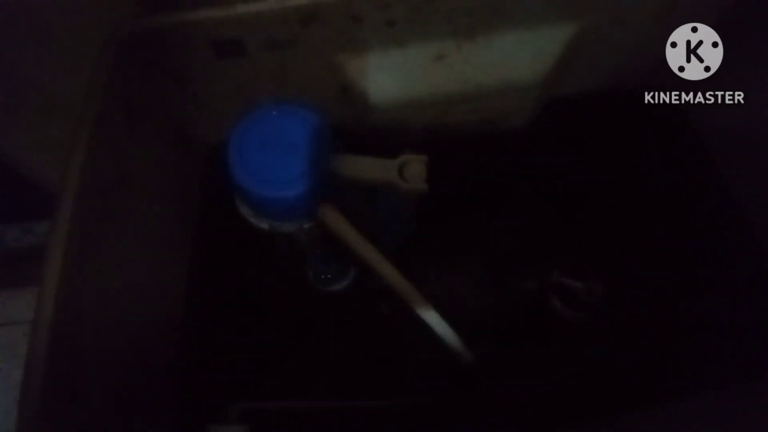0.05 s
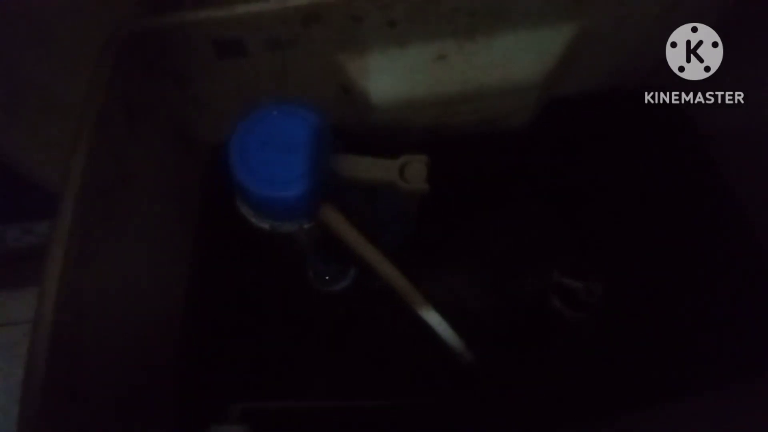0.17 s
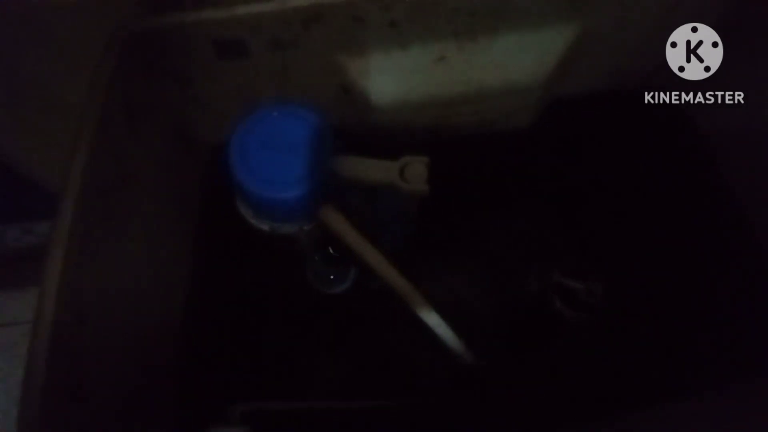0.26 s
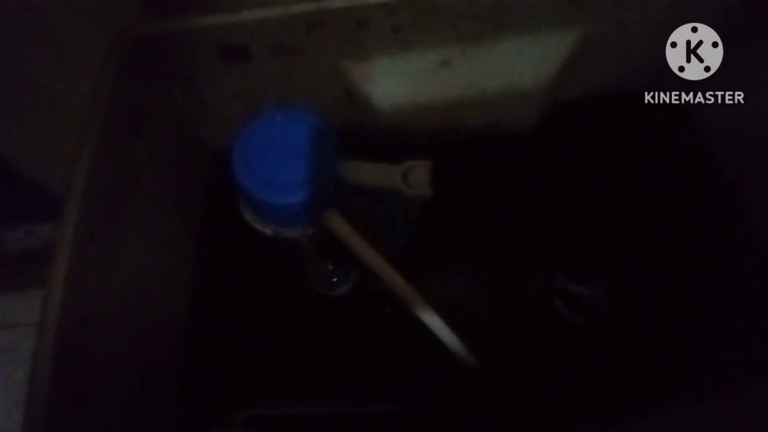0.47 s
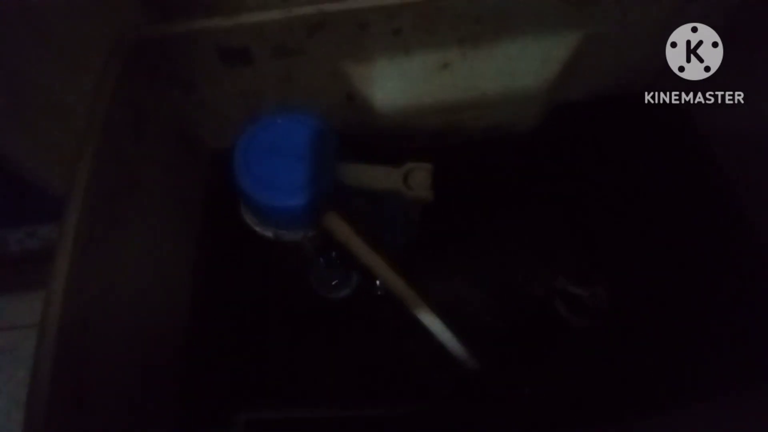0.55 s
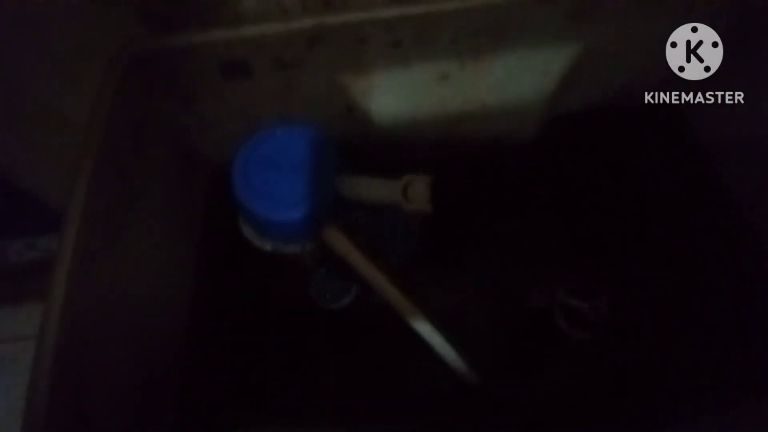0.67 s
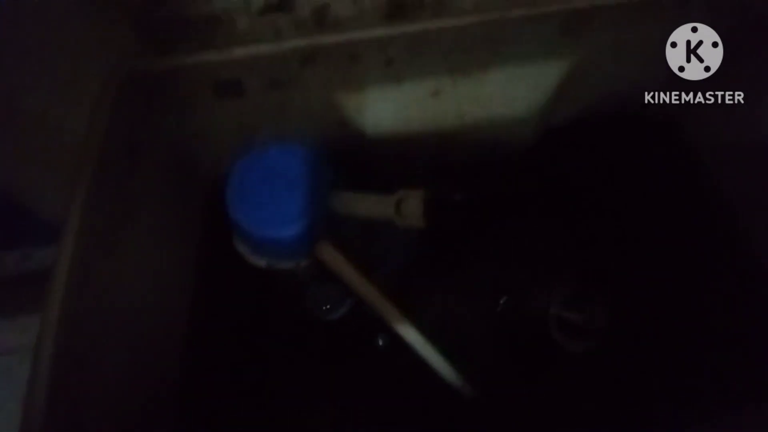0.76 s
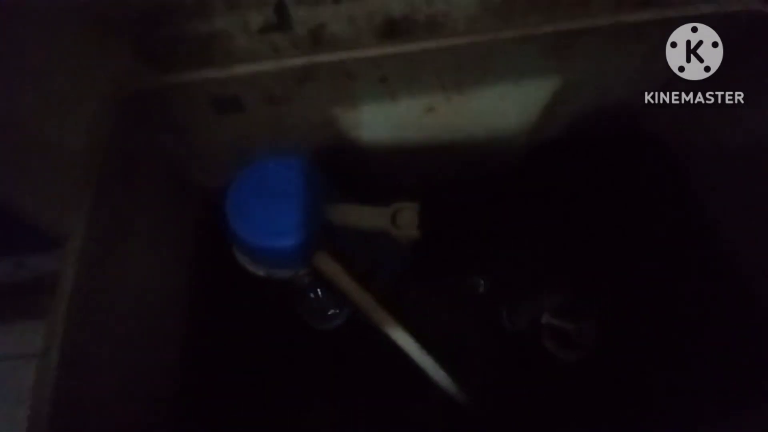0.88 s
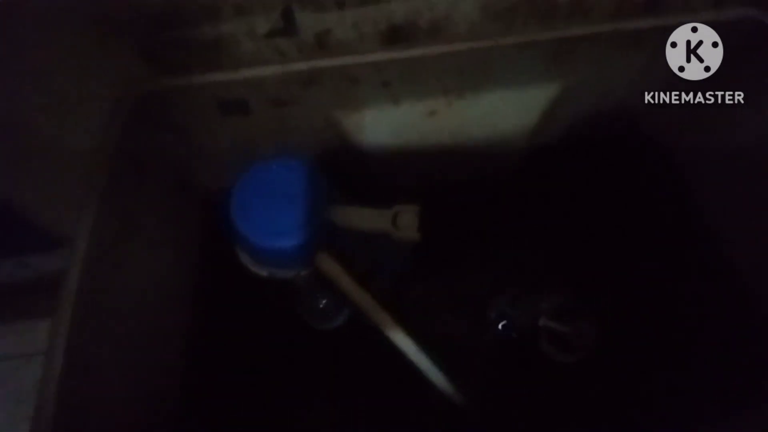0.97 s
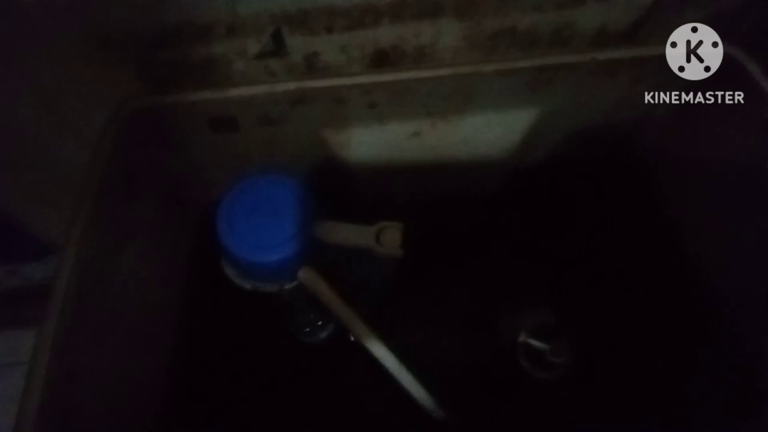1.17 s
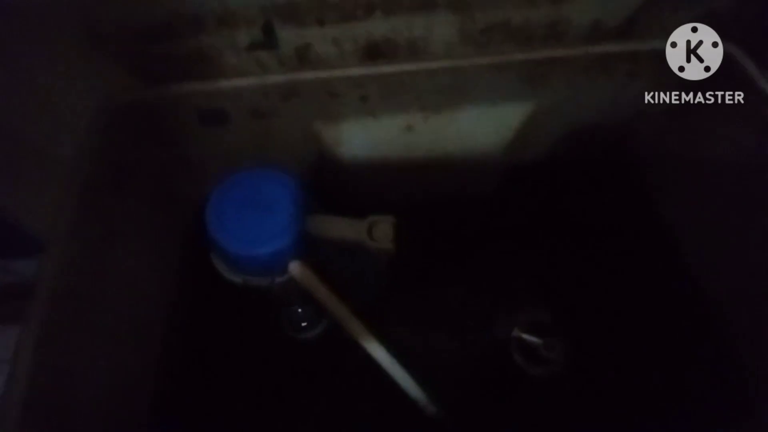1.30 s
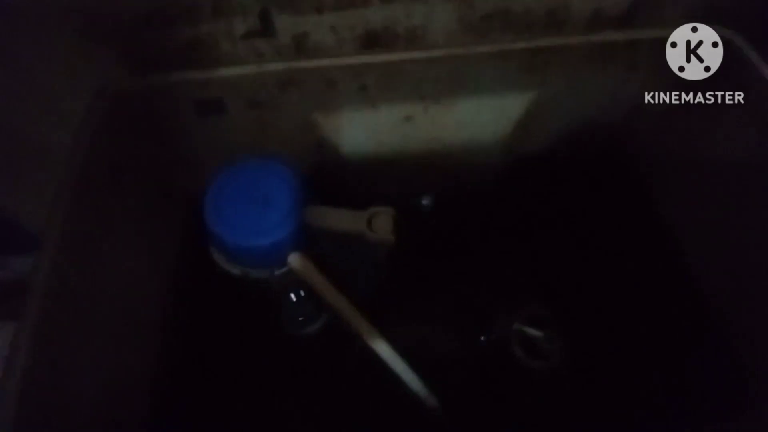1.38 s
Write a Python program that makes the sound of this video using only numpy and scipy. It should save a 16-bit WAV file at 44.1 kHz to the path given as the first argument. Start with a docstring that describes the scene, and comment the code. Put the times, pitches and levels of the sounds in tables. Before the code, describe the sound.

Close up inside a ceramic toilet tank, handled parts knock lightly, then clunk hard and hollow mid-way while water splashes and bubbles in short surges; it dies away in a small tiled room, small mono microphone.

```python
"""Water inside a ceramic toilet tank, heard close up: it rushes, splashes and bubbles in surges and dies away.
The rush is banded noise with a spatter of drops, bubbles are short rising tones, spurts are fading hiss. Moving
water shakes the tank's air and wall resonances above about 190 Hz; handled parts knock and set them all
ringing, the deepest too. Around it lie the echoes of a tiled room, from feedback delays, and a quiet floor of
coloured noise."""
import sys
import numpy as np
from scipy import signal
from scipy.io import wavfile

SR = 44100
rng = np.random.default_rng(int(sys.argv[2]) if len(sys.argv) > 2 else 0)


def invert_db(level):
    """Linear amplitude ratio for a level in decibels (20 dB per decade), elementwise."""
    return 10 ** (np.asarray(level, dtype=float) / 20)


def dump_mix(stems):
    """Bounce the given channels to the path in sys.argv[1] as a 16-bit WAV at rate SR."""
    frames = np.atleast_2d(stems).T  # one column per channel
    limited = np.clip(frames, -1, 1)  # hard clip at full scale
    pcm = np.round(limited * 32767).astype(np.int16)
    wavfile.write(sys.argv[1], SR, pcm)


N = 63945   # length in samples

# Resonances of the tank's air and walls: (frequency [Hz], relative level [dB], time to fall 60 dB [s])
RESONANCES = [(84, -30.5, 0.25), (120.7, -21.5, 1), (169.56, -6.5, 1), (203.05, 0, 0.59), (211.6, -8, .4),
              (220.3, 1.8, 0.49), (265.5, 0.5, 0.25), (343, -14.5, 0.84), (387, -14, 0.14),
              (471.7, -9, 0.39), (706, -5.5, 0.52), (775, -11, 0.35), (791.2, 1, 0.39), (801, -0.5, 0.28),
              (845, -8, 0.35), (876, -8, 0.3), (900.3, -0.5, 0.14), (929, -3.5, 0.34), (1004, -8.5, 0.3),
              (1141, -9, 0.25), (1211, 0, 0.4), (1293, 2.5, 0.16), (1332, -10.5, 0.44), (1361, -5.5, 0.28),
              (1420, -10, 0.3), (1514.4, 3.5, 0.28), (1545, -4.5, 0.23), (1694.5, 6.5, 0.19),
              (1758, -1, 0.48), (1978, 3.5, 0.11), (2070.5, 3, 0.22), (2136, -9, 0.3), (2190, -9, 0.25),
              (2325, -5, 0.53), (2623, 0.5, 0.21), (2702, -8, 0.75), (2840, -3.5, 0.24), (3190, -9.5, 0.28),
              (3520, -18, .2)]


def rms_one(x):
    """Scale to rms 1."""
    return x / np.sqrt(np.mean(x ** 2) + 1e-20)


def drift(rate_hz):
    """Slow chance with mean 0 and spread 1: noise through two equal low-pass poles, one value per 40 samples."""
    pole = np.exp(-2 * np.pi * rate_hz * 40 / SR)
    noise = rng.standard_normal(N // 40 + 2002)
    slow = signal.lfilter([1], [1, -2 * pole, pole ** 2], noise)[2000:]   # skip the filter's start
    slow = (slow - slow.mean()) / slow.std()
    return np.interp(np.arange(N) / 40, np.arange(len(slow)), slow)


def coloured(sources, spectrum, patchy_db, tilt_db=0):
    """Third-octave bands of two unrelated sources in turn, each band with its own level and flicker; rms 1."""
    out = 0
    edges = 35 * 2 ** np.arange(0, 9.1, 1 / 3)
    point_hz, point_db = np.transpose(spectrum)
    for k, (low, high) in enumerate(zip(edges, edges[1:])):
        band_filter = signal.butter(2, [low, high], "band", fs=SR, output="sos")
        band = signal.sosfilt(band_filter, sources[k % 2])
        centre_hz = np.sqrt(low * high)
        level_db = np.interp(np.log(centre_hz), np.log(point_hz), point_db)
        octaves = max(np.log2(centre_hz / 3000), -1.5)   # the tilt turns about 3 kHz
        out = out + band * invert_db(level_db + octaves * tilt_db + patchy_db * drift(32.0))
    return rms_one(out)


def splash(flow_db, tilt_db):
    """Turbulent hiss mixed with a spatter of drops of uneven size."""
    # Colour of the splash: (frequency [Hz], relative density [dB per Hz])
    spectrum = [(150, -74.5), (250, -32), (400, -15), (570, -36.5), (800, -7), (1200, -10.5), (1700, -1.5),
                (2400, 2.8), (3200, 4), (4200, -7), (5450, -18), (8000, -69), (10000, -42), (15400, -63)]
    drops_per_s, drop_share_db, splash_db = 3100, -10.5, 1.5
    sizes = invert_db(7.0 * np.minimum(rng.exponential(1, N), 5)) * rng.choice([-1, 1], N)
    drops = rms_one(sizes * (rng.random(N) < drops_per_s / SR))
    sources = rng.standard_normal((2, N)) + invert_db(drop_share_db) * drops
    return invert_db(splash_db + flow_db) * coloured(sources, spectrum, patchy_db=2.5, tilt_db=tilt_db)


def bubbles(flow_db):
    """Trapped air pops at random, in clumps; each bubble rings briefly and rises in pitch."""
    usual_per_s, low_hz, high_hz = 300, 750, 4300
    ring_cycles = 30    # cycles of the starting pitch in which the ring falls 60 dB
    pitch_rise = 0.06   # share of pitch gained over those cycles
    out, t = np.zeros(N + SR), np.arange(SR // 20) / SR
    starts = np.flatnonzero(rng.random(N) < usual_per_s * invert_db(5.0 * drift(14.0)) / SR)
    for start, (pitch, loudness) in zip(starts, rng.random((len(starts), 2))):
        hz = low_hz * (high_hz / low_hz) ** pitch
        age = t * hz / ring_cycles
        tone = np.sin(2 * np.pi * hz * t * (1 + pitch_rise * np.minimum(age, 2) / 2))
        attack = np.minimum(t * hz / 2, 1)   # two cycles
        level_db = flow_db[start] + 14.0 * (loudness - 0.5) - 60 * age
        out[start:start + len(t)] += invert_db(level_db) * attack * tone
    return invert_db(-3.5) * out[:N]


def spurts():
    """Spurts of spray: sudden bands of spattering hiss that die away."""
    # (time [s], starting level [dB], centre [Hz], width [octaves], time to fall 60 dB [s])
    spray = [(0.019, -33.5, 3630, 0.41, 0.26), (0.1, -49.5, 5700, 0.21, 0.45),
             (0.365, -39, 5100, 0.54, .12), (0.53, -32.5, 2430, 0.2, 0.26), (.619, -31, 3100, 1.06, 0.29),
             (.757, -29.5, 3860, 0.48, 0.18), (1.018, -43, 2850, 0.91, 0.54),
             (1.072, -50.5, 6000, 0.8, 0.18), (.497, -31, 2600, 0.35, 0.2), (0.757, -60, 13500, 0.4, .3),
             (.770, -23.5, 3390, 0.55, 0.26), (.335, -44, 3030, 0.31, 0.22), (.620, -47.5, 6760, 0.59, .4),
             (.758, -45, 6400, 0.56, 0.38), (1.392, -58, 5800, 0.15, 0.05), (.020, -70, 15000, .6, 0.48),
             (.180, -70.5, 14000, 0.91, 0.33), (1.088, -63.5, 15000, .5, .06),
             (.757, -35, 4470, 0.29, 0.12), (1.240, -51.5, 4100, 0.64, 0.11),
             (1.356, -52.5, 3300, 0.25, 0.11)]
    out, t = np.zeros(N + SR), np.arange(SR // 2) / SR
    for s, db, hz, width, t60 in spray:
        edges = np.minimum(hz * 2 ** (np.array([-0.5, 0.5]) * max(width, 0.1)), [18000, 19000])
        band_filter = signal.butter(3, edges, "band", fs=SR, output="sos")
        noise = rng.standard_normal(len(t))
        spatter = noise * invert_db(3.5 * np.minimum(rng.exponential(1, len(t)), 4))   # uneven grains
        hiss = rms_one(signal.sosfilt(band_filter, spatter))
        attack = np.minimum(t / 0.0034, 1)
        start = int(s * SR)
        out[start:start + len(t)] += hiss * invert_db(db - 60 * t / t60) * attack
    return out[:N]


def ring(x, hz, t60):
    """A two-pole resonance: a unit click sets a dying sine of starting height 1 ringing."""
    r = invert_db(-60 / (max(t60, 0.001) * SR))
    w = 2 * np.pi * hz / SR
    return signal.lfilter([0, np.sin(w)], [1, -2 * r * np.cos(w), r * r], x + 1e-18)


def slosh(drive_db):
    """The moving water shakes the tank resonances with noise, and each one's level wanders; those below about
    190 Hz are filtered away."""
    noise = rng.standard_normal(N) * invert_db(drive_db - 40)
    rings = np.zeros(N)
    for hz, db, t60 in RESONANCES:
        wander_db = np.clip(5.1 * drift(11.2), -9, 4)
        rings += invert_db(db + wander_db) * ring(noise, hz, t60)
    return signal.sosfilt(signal.butter(4, 190, "high", fs=SR, output="sos"), rings)


def knocks():
    """Each knock swells in, rings freely, then is partly damped; every resonance dies at its own rate."""
    # The struck spot favours resonances near one pitch:
    # (time [s], level [dB], favoured pitch [Hz], spread [octaves], time until damping [s])
    strikes = [(0.172, -32, 221, 0.03, 0.05), (0.012, -38, 212, 0.03, 0.05),
               (0.074, -31.5, 2100, 0.045, 0.067), (.050, -31.5, 1520, 0.05, 0.049),
               (.207, -17, 920, 0.063, 0.023), (.205, -29.5, 700, 0.087, 0.047),
               (.209, -16, 2150, 0.3, 0.037), (.216, -28, 222, 0.03, 0.045), (.258, -24, 950, 0.039, 0.028),
               (.296, -20, 917, 0.059, 0.032), (.335, -35, 210, .03, 0.04), (.402, -15.5, 892, 0.023, .018),
               (.402, -17.5, 1430, 0.29, 0.034), (.440, -26, 199, 0.074, 0.046),
               (.487, -22.5, 770, 0.029, 0.021), (.498, -28.5, 2327, .03, 0.031),
               (.500, -27.5, 2690, .05, 0.032), (0.29, -36, 1330, 0.03, .04), (.338, -34, 2840, .02, 0.05),
               (.541, -21, 2030, 0.06, .05), (.526, -11, 227, 0.042, 0.049),
               (.527, -18.5, 263, 0.15, 0.043), (.527, -15, 1030, 0.43, 0.013),
               (.540, -5, 1680, 0.52, 0.035), (.558, -8, 945, .2, 0.014), (.575, -5, 860, 0.11, 0.016),
               (.570, -14, 260, 0.24, 0.016), (.617, -4, 750, 0.11, 0.0069),
               (.620, -12.5, 1892, 0.07, 0.016), (.626, -11, 219, 0.025, 0.038),
               (.644, -16, 220, 0.02, 0.019), (.622, -32, 490, 0.23, 0.067), (.668, -19, 240, .1, .04),
               (.700, -27, 363, 0.17, 0.063), (.495, -30, 1290, 0.03, 0.03),
               (.625, -28.5, 1190, 0.043, 0.043), (.630, -27, 2620, 0.033, 0.024),
               (.656, -21, 790, .1, 0.01), (.673, -19, 240, 0.083, 0.071), (.680, -20, 830, 0.1, 0.01),
               (.720, -22.5, 746, 0.063, 0.035), (.757, -4, 247, 0.15, 0.014),
               (.768, -13.5, 804, 0.061, 0.0088), (.774, -16.5, 2327, 0.033, 0.053),
               (.776, -23, 2073, 0.027, 0.044), (.780, -22.5, 2617, 0.028, 0.061),
               (.780, -13.5, 1665, 0.088, 0.079), (0.797, -21, 203, 0.052, 0.041),
               (.834, -29.5, 810, 0.035, 0.025), (.864, -8, 215, 0.17, 0.041), (.866, -14, 805, .12, 0.038),
               (0.79, -31.5, 86, 0.28, 0.27), (0.865, -27.5, 132, .2, 0.07), (1.045, -29, 99, 0.3, 0.04),
               (0.53, -23.5, 146, 0.12, 0.13), (.910, -23, 830, 0.11, 0.014), (.972, -26, 870, 0.04, 0.025),
               (.960, -30, 1960, .08, 0.046), (0.105, -32, 2660, .05, .04), (0.147, -33, 2620, .03, .06),
               (.920, -17, 204, 0.16, 0.12), (.933, -16, 770, 0.15, 0.005), (.960, -20.5, 770, 0.062, .01),
               (1.015, -24, 858, 0.054, 0.021), (1.020, -27.5, 1305, 0.052, 0.028),
               (1.015, -35, 1760, 0.02, .04), (1.057, -9.5, 211.4, 0.021, 0.0326),
               (1.108, -21, 205, .04, 0.04), (1.140, -24.5, 196, .04, 0.041),
               (1.105, -37, 1720, 0.03, 0.059), (1.188, -36, 2170, .03, 0.014),
               (1.210, -40, 2175, 0.03, .05), (1.020, -34.5, 2700, .05, 0.037),
               (.215, -27.5, 785, 0.037, .06), (1.186, -31, 203, .04, .035), (1.278, -43, 154, 0.16, 0.021),
               (1.298, -49, 1760, .02, 0.045), (1.345, -48, 1420, .02, 0.06), (1.16, -37, 136, 0.16, 0.068),
               (1.268, -43, 734, 0.047, 0.05), (1.296, -30.5, 1354, 0.076, 0.063)]
    rise_s, rise_cycles = 0.0037, 1.26   # the swell lasts both together, in cycles of the favoured pitch
    # a hand or part comes to rest and damps most of the ring
    damp_cycles, left_ringing = 1.72, 0.32
    waver = 0.003   # the water level moves, so higher ringing pitches waver by up to this share, times drift
    hz, mode_db, t60 = np.transpose(RESONANCES)[:, :, None]
    out, t = np.zeros(N + SR), np.arange(SR // 2) / SR
    wander = np.cumsum(np.pad(drift(12.0), (0, SR))) / SR
    for s, db, spot_hz, spread, free_s in strikes:
        distance = np.log2(hz / spot_hz) / max(spread, 0.01)
        share = invert_db(mode_db) * np.exp(-0.5 * distance ** 2)
        near = share[:, 0] > share.max() / 200   # leave out resonances too faint to matter
        start = int(s * SR)
        depth = waver * np.clip((spot_hz - 500) / 500, 0, 1)   # none below 500 Hz, full from 1 kHz
        stretched = t + depth * (wander[start:start + len(t)] - wander[start])
        tones = share[near] * invert_db(-60 * t / t60[near]) * np.sin(2 * np.pi * hz[near] * stretched)
        swell = np.sin(np.pi / 2 * np.minimum(t / (rise_s + rise_cycles / spot_hz), 1)) ** 2
        damped = np.sin(np.pi / 2 * np.clip((t - free_s) * spot_hz / damp_cycles, 0, 1)) ** 2
        envelope = invert_db(db) * swell * (1 - (1 - left_ringing) * damped)
        out[start:start + len(t)] += envelope * tones.sum(axis=0) / share.sum()
    return out[:N]


def bathroom(x):
    """Echoes of the tiled room: eight feedback delays, duller on every round."""
    t60_s, wall_cut_hz = 0.43, 7000
    out, dull = np.zeros(N), np.exp(-2 * np.pi * wall_cut_hz / SR)
    lags = (np.geomspace(0.011, 0.037, 8) * SR).astype(int)   # 11 to 37 ms
    for k, lag in enumerate(lags):
        loop, gain, state = x.copy(), invert_db(-60 * lag / SR / t60_s), [0.]
        for i in range(lag, N, lag):
            back, state = signal.lfilter([gain * (1 - dull)], [1, -dull], loop[i - lag:i], zi=state)
            loop[i:i + lag] += back[:N - i]
        out += (loop - x) * (-1) ** k   # echoes only, signs in turn
    return out


def room_floor():
    """The quiet background of the room: steady coloured noise with flickering bands."""
    # Colour of the background: (frequency [Hz], relative density [dB per Hz])
    spectrum = [(75, -27), (120, -8), (259, -9), (341, -10), (994, -38), (1440, -5), (1560, -21),
                (3130, -24.5), (3540, -20.5), (15400, -59)]
    return invert_db(-52) * coloured(rng.standard_normal((2, N)), spectrum, patchy_db=3.5)


def scene():
    """Water and knocks close up in the tank, with the tiled room and its quiet floor behind them."""
    # Surges of the water: (time [s], relative level [dB],
    # drive of the tank resonances relative to that level [dB], brightness [dB per octave])
    surges = [(0.0, -40, 6, -6.5), (0.032, -35, -10, -7), (0.176, -38, -0.5, -3), (0.23, -37.5, -4.5, -8),
              (0.294, -42.5, 0.5, -10.5), (0.35, -38.5, -2.5, 0), (0.472, -45, 8, -5),
              (0.564, -33, 5, -19.5), (0.608, -40.5, -5, 8), (0.63, -28, 4, -15), (0.75, -47, -15.5, 8),
              (0.762, -28, 5, 1), (0.774, -21, -1, -2.5), (0.948, -46.5, 2, -9), (1.122, -41, -3.5, 9),
              (1.206, -52, -6, -6), (1.45, -66, 8, -7.5)]
    s, flow, drive, bright = np.transpose(surges)
    t = np.arange(N) / SR
    flow_db = np.interp(t, s, flow)
    drive_db = np.interp(t, s, flow + drive)
    tilt_db = np.interp(t, s, bright)
    water = splash(flow_db, tilt_db) + bubbles(flow_db) + spurts()
    tank = water + slosh(drive_db) + knocks()
    mix = tank + invert_db(-19) * bathroom(tank) + room_floor()
    return mix[None]   # one channel


def band_limit(x):
    """A steep low-pass at the top of the band."""
    return signal.sosfilt(signal.butter(12, 15550, fs=SR, output="sos"), x)


def record(dry):
    """Small microphone close to the water, without deep bass or the last treble."""
    no_last_treble = signal.sosfilt(signal.cheby2(10, 50, 16600, fs=SR, output="sos"), dry)
    mix = signal.sosfilt(signal.butter(4, 75, "high", fs=SR, output="sos"), no_last_treble)
    return band_limit(mix)


dry = scene()
out = record(dry)
dump_mix(out)
```